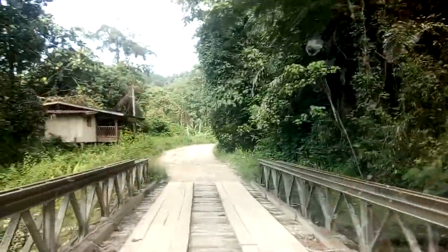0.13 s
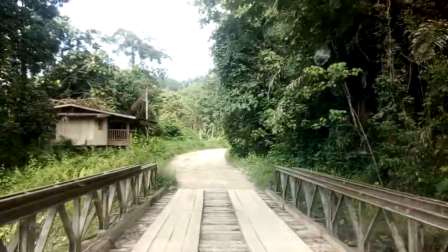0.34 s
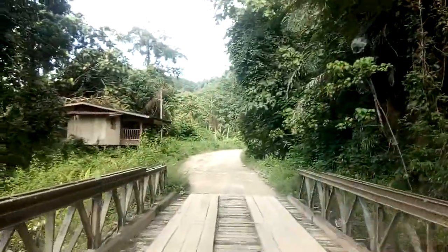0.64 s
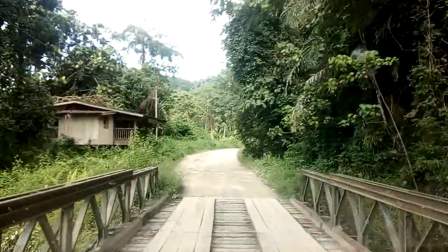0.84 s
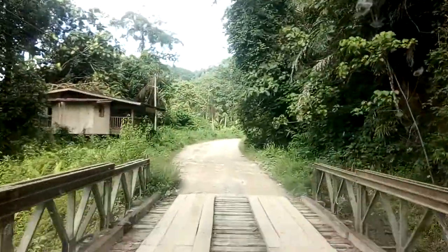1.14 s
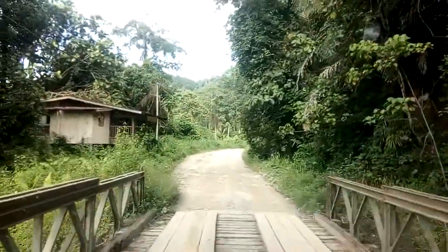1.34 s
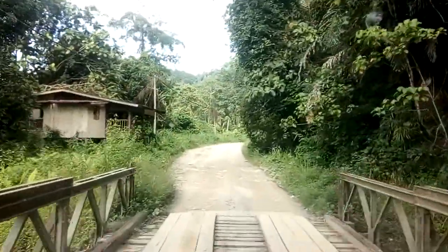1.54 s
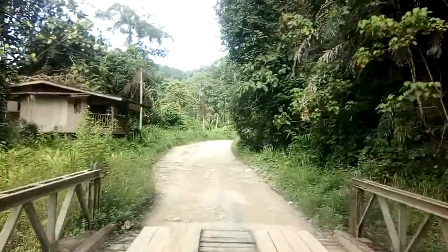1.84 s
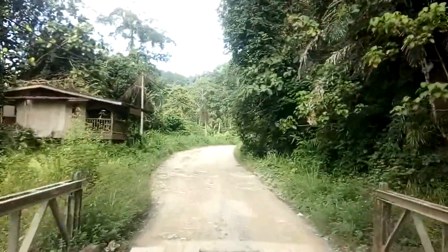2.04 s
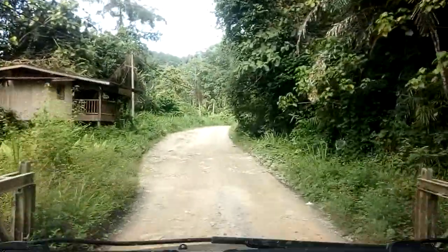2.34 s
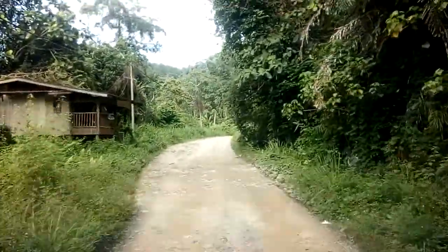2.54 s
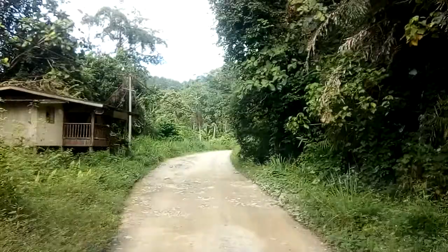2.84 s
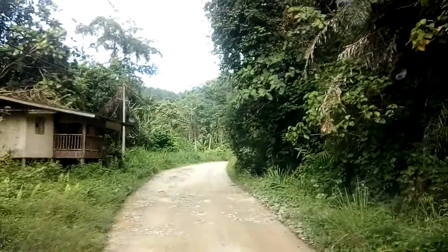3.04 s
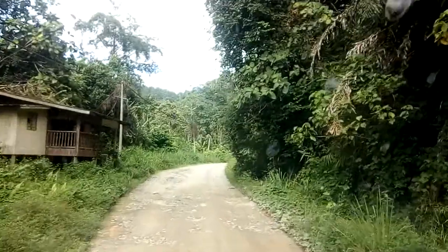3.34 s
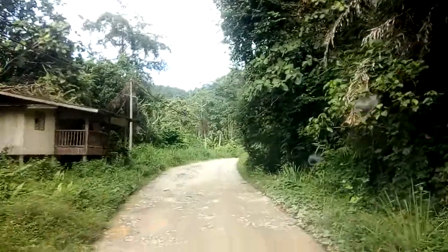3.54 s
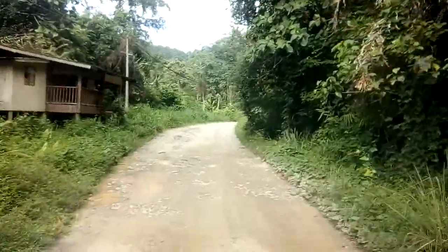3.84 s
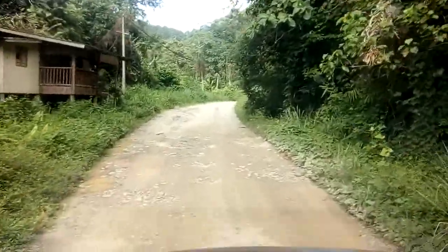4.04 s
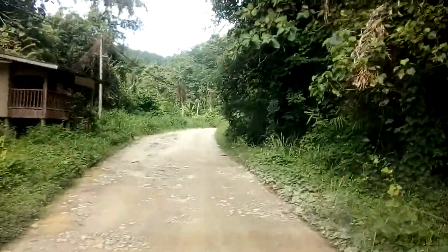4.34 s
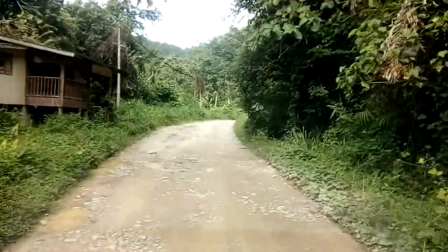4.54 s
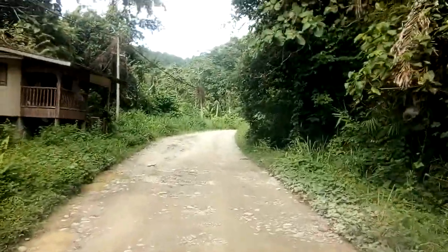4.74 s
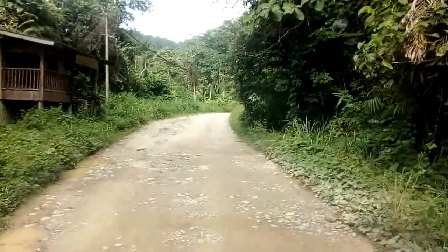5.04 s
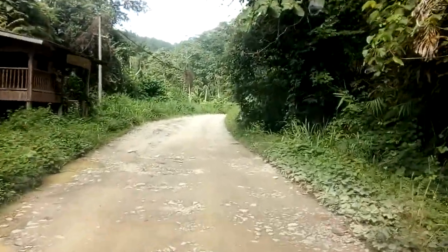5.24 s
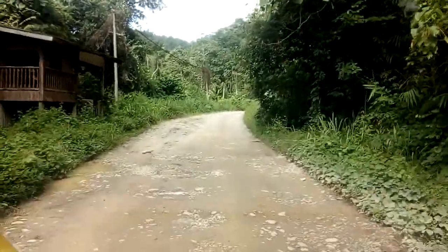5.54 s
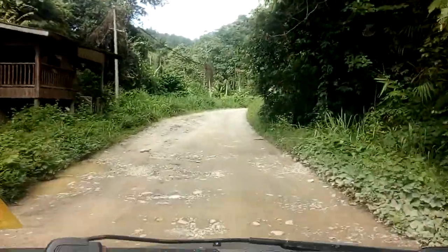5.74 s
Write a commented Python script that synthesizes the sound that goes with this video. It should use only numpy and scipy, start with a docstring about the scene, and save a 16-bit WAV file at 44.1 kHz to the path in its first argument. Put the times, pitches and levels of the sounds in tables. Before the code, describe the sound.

A vehicle rumbles off a wooden plank bridge onto gravel, its low engine easing down as bumps thud and stones crunch under the tyres.

```python
"""Behind the windscreen of a vehicle that rolls over a plank bridge, eases off the throttle and goes on
along a stony forest road. Planks slap and ring in shared wooden modes; bumps thump as short low swings.
Shaped noise booms in the cabin and random impacts shake its panels, over a low four-cylinder drone of harmonics.
Gravel is noise flurries, snaps and ringing pebbles under the tyres; jolts rattle the body, the underbody
knocks, fittings and brakes squeak, and two stones tick sharply, over faint steady hiss and whine."""
import sys
import numpy as np
from scipy import signal
from scipy.fft import rfft, irfft
from scipy.io import wavfile
from scipy.ndimage import uniform_filter1d

SR = 44100
rng = np.random.default_rng(int(sys.argv[2]) if len(sys.argv) > 2 else 0)


def put_to_file(sound):
    """Save the sound as 16-bit audio at rate SR, in the file named by the first command-line argument."""
    columns = np.atleast_2d(sound).T  # one column per channel
    safe = np.clip(columns, -1, 1)
    whole_steps = np.round(safe * 32767)
    wavfile.write(sys.argv[1], SR, whole_steps.astype(np.int16))


N = 259749
T = np.arange(N) / SR

# how stony the ground is along the way: time_s, stony_share (0-1)
STONY_GROUND = [(0, 0), (2.1, 0.2), (3.35, 0), (3.5, 0.82), (5.89, 1)]


def undb(db):
    """Decibels to gain."""
    return 10 ** (np.asarray(db) / 20)


def unit(x):
    """Scale to rms 1."""
    return x / np.sqrt(np.mean(x ** 2))


def curves(table):
    """Each column of a table, joined by straight lines in time."""
    s, *columns = np.transpose(table)
    return [np.interp(T, s, column) for column in columns]


def stony_share():
    """Share of stony ground under the wheels over time."""
    return np.clip(curves(STONY_GROUND)[0], 0, 1)


def walk(rate):
    """Slow chance at rms 1: random levels held for 1 / rate seconds and slewed twice."""
    hold = max(int(SR / rate), 1)
    steps = np.repeat(rng.standard_normal(N // hold + 1), hold)
    slewed = uniform_filter1d(uniform_filter1d(steps, hold), hold)
    return unit(slewed[:N])


def soften(x, hz, kind="low", order=2):
    """A plain low-pass or high-pass."""
    return signal.sosfilt(signal.butter(order, min(hz, .45 * SR), kind, fs=SR, output="sos"), x)


def colour(x, points, tilt_db=0, size=8192):
    """Pass x through a causal body with this spectrum, tilted by some dB an octave."""
    hz, db = np.transpose(points)
    octave = np.log2(np.maximum(np.arange(size // 2 + 1) * SR / size, 1))
    tilted_db = db + tilt_db * np.log2(hz / hz[0])
    response = undb(np.interp(octave, np.log2(hz), tilted_db))
    # folding the cepstrum forward in time makes the response minimum phase
    cepstrum = irfft(np.log(response))
    cepstrum[1:size // 2] *= 2
    cepstrum[size // 2 + 1:] = 0
    impulse = irfft(np.exp(rfft(cepstrum)))
    return signal.fftconvolve(x, impulse)[:len(x)]


def resonant(points, count=36):
    """The same colour with random peaks and dips."""
    hz, db = np.transpose(points)
    fine_hz = np.geomspace(hz[0], hz[-1], count)
    ripple_db = rng.uniform(-4, 4, count)
    return np.column_stack([fine_hz, np.interp(np.log(fine_hz), np.log(hz), db) + ripple_db])


def add(out, s, sound, peak_db):
    """Mix a sound in at time s with the given peak."""
    i = int(s * SR)
    scaled = undb(peak_db) * sound / np.abs(sound).max()
    out[i:i + len(sound)] += scaled[:N - i]


def grains(rate, spread_db):
    """Random impacts, about rate a second, mostly small with a few large ones."""
    hit = rng.random(N) < rate / SR
    sign = rng.choice([-1, 1], N)
    return hit * sign * undb(spread_db * np.minimum(rng.exponential(size=N), 4.5))


def flurries(depth_db, rate, count=40):
    """Noise in many narrow bands that each swell and sink on their own."""
    edges_hz = np.linspace(450, 10450, count + 1)
    out = np.zeros(N)
    for band in zip(edges_hz, edges_hz[1:]):
        drive = rng.standard_normal(N) * undb(depth_db * np.minimum(walk(rate), 2))
        out += signal.sosfilt(signal.butter(2, band, "band", fs=SR, output="sos"), drive)
    return unit(out)


def body(t, hz, t60, spread=0.042, side=0.75):
    """A stiff part rings at its pitch, with weaker and shorter modes close on either side."""
    modes = [(1, 1), (1 - spread, side), (1 + spread, side)]  # (pitch ratio, gain and share of t60)
    return sum(gain * undb(-60 * t / (t60 * gain)) * np.sin(2 * np.pi * hz * ratio * t)
               for ratio, gain in modes)


def background_hiss(rms_db=-75.5):
    """Steady noise shaped by one fixed spectrum."""
    # colour of the hiss: frequency_hz, relative_db_per_hz
    spectrum = [(500, -6.5), (3000, 0), (6000, 0), (7700, -6), (8600, -14.5), (10500, -11), (12500, -17),
                (15500, -15.5)]
    return undb(rms_db) * unit(colour(rng.standard_normal(N), spectrum))


def electrical_whine():
    """A faint, steady sine tone."""
    # the whine: pitch_hz, rms_level_db
    tones = [(6449, -92)]
    return sum(np.sqrt(2) * undb(db) * np.sin(2 * np.pi * hz * T) for hz, db in tones)


def squeaks(waver=0.0083, flutter_db=4.0):
    """Brief friction tones of fittings and brakes, unsteady in pitch and strength."""
    # swells of tone: centre_s, mean pitch_hz, level_db before flutter, half_length_s (to 1/e)
    tones = [(2.138, 10800, -71, 0.022), (2.97, 7750, -81, 0.08), (3.28, 7410, -79, 0.093),
             (3.53, 7410, -78, 0.04), (5.814, 2010, -53.5, 0.011)]
    run = np.cumsum(1 + waver * walk(570)) / SR  # time that runs unevenly bends every pitch
    flutter = undb(flutter_db * walk(120))
    return flutter * sum(undb(db) * np.exp(-((T - s) / half) ** 2) * np.sin(2 * np.pi * hz * run)
                         for s, hz, db, half in tones)


def engine(waver=0.00052, rough_db=4):
    """Harmonics of the firing rate, each wavering in level as the mounts shake."""
    # the engine slows as the throttle eases: time_s, mean firing_rate_hz, level_db
    throttle = [(0, 54.96, -43), (1.3, 53, -59), (2.1, 51.5, -47.5), (2.42, 46.06, -47.5),
                (2.62, 45.14, -45), (2.9, 40.73, -43.5), (3.3, 37.03, -44), (5.89, 36.3, -44.5)]
    # harmonics: multiple of the firing rate, relative_level_db
    orders = [(1, -1.5), (2, -14.5), (3, -7.5), (4, -4), (5, -29.5), (6, -26), (7, -20)]
    hz, db = curves(throttle)
    phase = 2 * np.pi * np.cumsum(hz * (1 + waver * walk(10))) / SR
    drone = np.zeros(N)
    for multiple, gain_db in orders:
        strength = undb(gain_db + rough_db * walk(3.218))
        drone += strength * np.sin(round(multiple) * phase + 2 * np.pi * rng.random())
    return undb(db) * drone


def ride(panels_below_boom_db=9, stony_panels_db=-4, gravel_share=0.53):
    """Levels of boom, panels and gravel: steady rolling, lifted by rough patches; only stones crunch more."""
    # rolling, before each layer's own trim: time_s, boom_db, gravel_db
    rolling = [(0, -41.5, -57.5), (1.6, -40.5, -56), (2.5, -44.5, -60.5), (3.42, -47.5, -67),
               (3.48, -36, -56.5), (4.1, -39, -61), (4.6, -34.5, -58), (5.89, -36.5, -59)]
    # rough patches under the wheels: centre_s, boom_lift_db, panel_lift_db, half_length_s (to 1/e)
    patches = [(0.204, 6.5, 11, 0.051), (0.418, 1.5, 6.5, 0.096), (0.849, 3, 6, 0.04),
               (1.287, 13.5, 6, 0.059), (1.737, 5.5, 4, 0.12), (2.246, 2, 8.5, 0.072), (3.526, 4, 4, 0.053),
               (3.74, 7.5, 9, 0.11), (3.931, 7, 5, 0.045), (4.05, 7.5, -1.5, 0.04), (4.309, 5, 5.5, 0.097),
               (4.492, 5, 3.5, 0.086), (5.086, 1.5, 6, 0.064), (5.425, 3.5, 7, 0.06), (5.835, 4, 4, 0.1)]
    boom_db, gravel_db = curves(rolling)
    stony = stony_share()
    heave_db, jolt_db = sum(np.outer([boom, shake], np.exp(-((T - s) / half) ** 2))
                            for s, boom, shake, half in patches)
    # on stones the boom gains more than the panels
    shake_db = boom_db - panels_below_boom_db + stony_panels_db * stony
    # a share of the panel lift reaches the loose gravel
    return boom_db + heave_db, shake_db + jolt_db, gravel_db + gravel_share * stony * jolt_db


def cabin(boom_db, shake_db):
    """The uneven ground drums through the tyres: the cabin air booms and the panels shake."""
    # colour of the cabin air: frequency_hz, relative_db_per_hz
    air_colour = [(11, -50.5), (18, -17), (38, 0), (55, 6.5), (85, 1), (141, 0.5), (200, -8), (260, -15),
                  (340, -27.5), (570, -120)]
    # colour of the panels: frequency_hz, relative_db_per_hz
    panel_colour = [(100, -28.5), (160, -4), (183, -7.5), (216, -3), (277, -2.5), (334, -8.5), (387, -7),
                    (449, -10), (521, -13), (613, -14), (849, -21), (1000, -27.5), (1300, -28),
                    (2200, -120)]
    boom = unit(colour(rng.standard_normal(N), air_colour))
    panels = unit(colour(grains(900, 1.73), panel_colour))
    return boom * undb(boom_db + 0.5) + panels * undb(shake_db + 2.5)


def crackle(cluster_db=1.0, grit_db=-4):
    """Dry grit snaps under the tread and loose trim buzzes in flurries; both come in clusters."""
    # colour of the gravel: frequency_hz, relative_db_per_hz
    gravel_colour = [(500, -36.5), (800, 3), (1000, 4.5), (1350, 7.5), (1700, -0.5), (2300, -8.5),
                     (2900, -8.5), (3400, -20), (4200, -25), (5500, -14.5), (6400, -34), (7600, -33.5),
                     (9000, -32.5), (12000, -58)]
    buzz = flurries(depth_db=7, rate=48)
    grit = undb(grit_db) * unit(grains(450, 3.2))
    clusters = undb(cluster_db * walk(55))
    return unit(colour((buzz + grit) * clusters, gravel_colour))


def pebbles(count=2000, low_hz=950, high_hz=6100, tilt_db=-2.8, skid_s=0.005, skid=0.18, crunch_db=3.0):
    """Many stones grind under the tread in irregular crunches, each ringing briefly at its own pitch."""
    out, t = np.zeros(N), T[:SR // 30]
    crunch = crunch_db * np.minimum(walk(30), 1.5)
    for when, pitch, force, damping in rng.random((count, 4)):
        hz = low_hz * (high_hz / low_hz) ** pitch
        force_db = 13 * force ** 3  # few stones are hit hard
        db = force_db + crunch[int(when * N)] + tilt_db * np.log2(hz / low_hz)
        contact = (t == 0) + skid * rng.standard_normal(len(t)) * np.exp(-t / skid_s)
        t60_s = 0.034 * (.5 + damping)
        ring = body(t, hz, t60_s, spread=0.16, side=0.6)
        add(out, when * T[-1], signal.fftconvolve(contact, ring)[:len(t)], db)
    return unit(soften(out, 6300, order=8))


def tyres(gravel_db):
    """Tread and air hiss; on stones the hiss breaks up into crackle and clinks."""
    # colour of tread and air: frequency_hz, relative_db_per_hz
    hiss_colour = [(470, -27), (800, -8.5), (1130, 0.5), (1220, -6), (1440, -2.5), (1710, -9.5),
                   (2160, -11.5), (2340, -12), (3510, -11), (3880, -18.5), (4710, -18.5), (5760, -22.5),
                   (9000, -56.5), (11700, -65), (19800, -120)]
    stony = stony_share()
    hiss = unit(colour(flurries(depth_db=2.5, rate=30), hiss_colour)) * undb(1.0 * walk(22.2))
    smooth = undb(0.4) * np.sqrt(1 - stony) * hiss
    broken = undb(-1.5) * np.sqrt(stony) * crackle()
    clinks = undb(-3) * stony * pebbles()
    return undb(gravel_db) * (smooth + broken + clinks)


def ticks(scrape=0.035, decay_s=0.0035):
    """A flung stone makes one hard, bright contact with a tiny scrape after it."""
    # stones against the body: start_s, peak_db
    stones = [(3.7418, -26.5), (4.6783, -33.5)]
    # colour of the contact: frequency_hz, relative_db
    tick_colour = [(1000, -16), (2500, -3.5), (3800, 6), (5500, 7.5), (7500, 0.5), (10000, -17),
                   (15000, -17)]
    out, t = np.zeros(N), T[:SR // 20]
    for s, db in stones:
        contact = (t == 0) + scrape * rng.standard_normal(len(t)) * np.exp(-t / decay_s)
        add(out, s, colour(contact, tick_colour), db)
    return out


def rattles(rise=0.38, chatter_db=3.0):
    """Loose parts chatter in a quick, dying run of contacts, each run with resonances of its own."""
    # jolts: start_s, peak_db before reflections, brightness_db_per_octave, decay_s (to 1/e)
    jolts = [(0.467, -39.5, -4.5, 0.008), (0.829, -38.5, -8.5, 0.0032), (1.789, -37.5, -3.5, 0.0049),
             (2.255, -43.5, 1, 0.019), (2.339, -37, -7.5, 0.0051), (3.472, -45.5, -0.5, 0.0044),
             (3.535, -42, -4, 0.016), (3.581, -48, 0, 0.0045), (3.612, -48.5, 0, 0.014),
             (3.645, -39, -5.5, 0.008), (3.687, -30, -5, 0.0038), (3.702, -43.5, -3, 0.032),
             (3.752, -40.5, -5.5, 0.018), (3.788, -44, 2, 0.011), (3.818, -38.5, -6.5, 0.006),
             (3.916, -36, -6.5, 0.016), (4.076, -47, 2, 0.011), (4.204, -30.5, -0.5, 0.0046),
             (4.294, -34.5, -6.5, 0.018), (4.332, -44.5, 1.5, 0.017), (4.360, -33, -8, 0.0071),
             (4.384, -45.5, 2, 0.0095), (4.454, -36.5, -6.5, 0.043), (4.5246, -28.5, -4, 0.003),
             (4.551, -45, -5, 0.0077), (4.660, -36.5, -11, 0.0036), (4.688, -46, -1, 0.009),
             (4.730, -38, -4, 0.0096), (4.756, -38, -3, 0.004), (4.815, -48, -3.5, 0.0055),
             (4.853, -43, -2.5, 0.0066), (4.902, -52, -4, 0.0055), (5.045, -46.5, 0.5, 0.034),
             (5.132, -32.5, -5, 0.003), (5.310, -34.5, 2.5, 0.01), (5.484, -36.5, -6.5, 0.008),
             (5.519, -36.5, -8.5, 0.0062), (5.587, -37.5, -10, 0.013), (5.699, -37.5, -3, 0.007),
             (5.740, -43, -4, .015), (5.852, -34.5, -11, 0.021)]
    # shared colour of the loose parts: frequency_hz, relative_db
    part_colour = [(250, -13.5), (550, -7), (850, -10), (1300, -1.5), (1800, -2.5), (2400, -4),
                   (3400, -7.5), (5800, -10.5), (7000, -24.5), (9000, -34), (15000, -54.5)]
    out, t = np.zeros(N), T[:SR // 5]
    for s, db, tilt_db, decay in jolts:
        swell = (1 - np.exp(-t / (rise * decay))) * np.exp(-t / decay)
        contacts = grains(5000, chatter_db)[:len(t)] * swell
        add(out, s, colour(contacts, resonant(part_colour), tilt_db), db)
    return out


def reflections(x, db, t60):
    """Glass and trim throw a sound back as a dense tail of random echoes that dies away quickly."""
    t = T[:SR // 6]
    tail = rng.standard_normal(len(t)) * undb(-60 * t / t60) * (t > .002)  # first return after 2 ms
    return x + undb(db) * signal.fftconvolve(x, tail / np.linalg.norm(tail))[:N]


def knocks(push_s=0.00034, rebound_s=0.0042, rebound=0.44):
    """A short push sets one part of the underbody ringing; it bounces and strikes once more."""
    # hollow knocks: start_s, peak_db, pitch_hz, t60_s
    hits = [(0.832, -34, 345, 0.049), (0.836, -40, 1170, 0.035), (1.272, -27.5, 204, 0.071),
            (1.496, -35, 560, 0.024), (1.663, -33, 273, 0.068), (2.222, -40, 380, 0.05),
            (2.285, -32, 280, 0.057), (2.340, -39.5, 593, 0.038), (3.507, -31.5, 294, 0.058),
            (3.509, -39.5, 630, .03), (3.614, -31.5, 249, 0.11), (3.689, -37, 675, 0.048),
            (3.69, -42, 1610, .03), (3.721, -22.5, 263, 0.038), (3.760, -35, 392, 0.09),
            (3.794, -49, 6400, 0.023), (3.928, -30, 293, 0.16), (4.023, -31.5, 227, .07),
            (3.947, -34.5, 438, 0.11), (4.2055, -27, 652, 0.024), (4.206, -38, 1180, 0.045),
            (4.525, -30.5, 1324, 0.03), (4.528, -33, 546, 0.052), (5.134, -40.5, 1120, 0.041),
            (5.314, -37, 2380, 0.051), (5.315, -43, 3840, 0.044), (5.523, -45, 1160, 0.03),
            (5.701, -47, 2390, .04)]
    out, t = np.zeros(N), T[:SR // 8]
    for s, db, hz, t60 in hits:
        ring = body(t, hz, t60) * (1 - np.exp(-t / push_s))
        lag = np.ceil(rebound_s * hz) / hz  # the rebound waits for a whole number of swings
        add(out, s, ring + rebound * np.interp(t - lag, t, ring, left=0), db)
    return out


def thumps(stiffen=0.14, rise=0.98):
    """A wheel takes a bump in one rounded swing; the stiffening spring adds an overtone at its height."""
    # suspension bumps: centre_s, approximate peak_db, pitch_hz, half_length_s (fall to 1/e; rise is a share of it)
    bumps = [(1.297, -26.5, 86, 0.004), (1.734, -23, 98, 0.0087), (2.211, -25, 73.4, 0.0067),
             (3.480, -18.5, 131, 0.0017), (3.513, -28.5, 100, 0.014), (3.707, -18.5, 143, 0.0043),
             (3.752, -31, 54.6, 0.0093), (3.798, -28.5, 117, 0.0085), (3.935, -31, 165, 0.02),
             (4.3025, -9.5, 133, 0.0042), (4.32, -23, 50.5, 0.039), (4.468, -18, 111.3, 0.01)]
    out = np.zeros(N)
    for s, db, hz, half in bumps:
        t = T - s
        swing = np.exp(-np.logaddexp(-t / (rise * half), t / half))
        swing /= swing.max()
        phase = 2 * np.pi * hz * t
        overtone = stiffen * swing ** 2 * np.cos(2 * phase)
        out += undb(db) * (swing * np.cos(phase) + overtone) / (1 + stiffen)
    return out


def planks(scatter=0.0068, slap_s=0.015, slap=0.066, muffle_hz=1250):
    """Each plank slaps, chatters and rings in the same wooden modes; the floor of the cabin muffles it."""
    # loose planks under the wheels: start_s, peak_db before muffling, brightness_db_per_octave
    strikes = [(0.161, -36, 3), (.200, -35, 1), (0.368, -29, 3), (.386, -25.5, 17), (0.398, -21.5, -1),
               (0.421, -37, -2), (.445, -33, 3), (.709, -22.5, 11), (0.7174, -31, 13), (.832, -30, 6),
               (.841, -36, 7), (1.223, -39.5, 2), (1.728, -32.5, 9), (2.828, -37.5, -6)]
    # wooden modes: mean pitch_hz, relative_level_db, t60_s
    modes = [(283, -6.5, 0.091), (380, 3.5, 0.08), (630, 0, 0.035), (805, 2.5, 0.052), (880, -8, 0.039),
             (1125, -16.5, 0.02)]
    out, t = np.zeros(N), T[:SR // 5]
    for s, db, tilt_db in strikes:
        ring = np.zeros(len(t))
        for hz, gain_db, t60 in modes:
            pitch_hz = hz * (1 + scatter * rng.standard_normal())
            decay = undb(gain_db + tilt_db * np.log2(hz) - 60 * t / t60)
            ring += decay * np.sin(2 * np.pi * pitch_hz * t)
        contact = slap * rng.standard_normal(len(t)) * np.exp(-t / slap_s)
        contact[0] += 2  # the first hard touch
        add(out, s, signal.fftconvolve(contact, ring)[:len(t)], db)
    return soften(out, muffle_hz, order=4)


def scene():
    """Everything as heard behind the windscreen."""
    boom_db, shake_db, gravel_db = ride()
    background = background_hiss() + electrical_whine() + squeaks()
    rolling = engine() + cabin(boom_db, shake_db) + tyres(gravel_db)
    clatter = ticks() + reflections(rattles(), db=-5, t60=0.12) + knocks()
    return (background + rolling + clatter + thumps() + planks())[None]


def record(dry, bass_hz=27, top_hz=15500):
    """The microphone loses the deepest bass and the recorder cuts the top steeply."""
    heard = soften(dry, bass_hz, "high", order=4)
    return signal.sosfilt(signal.ellip(10, .2, 80, top_hz, fs=SR, output="sos"), heard)


dry = scene()
out = record(dry)
put_to_file(out)
```